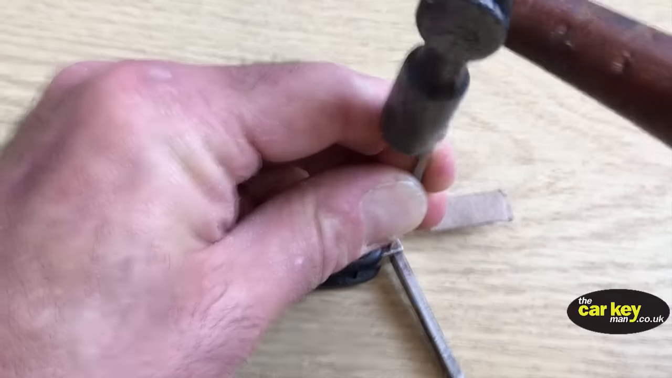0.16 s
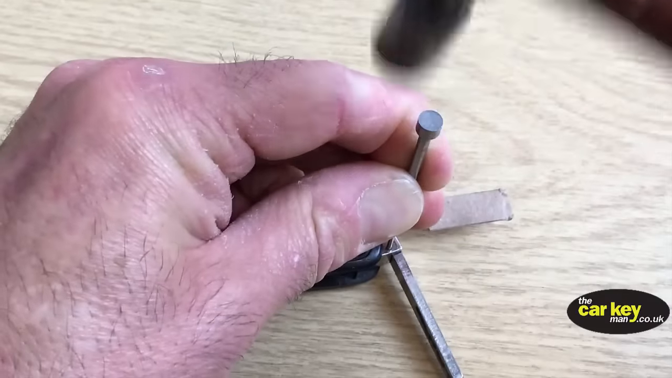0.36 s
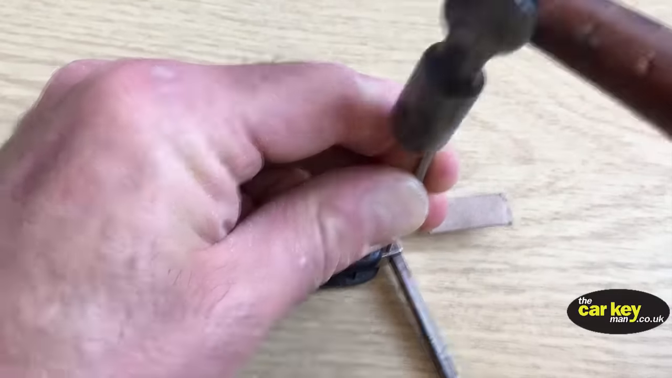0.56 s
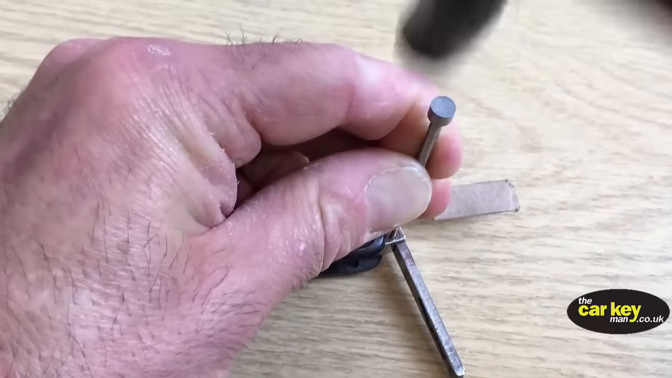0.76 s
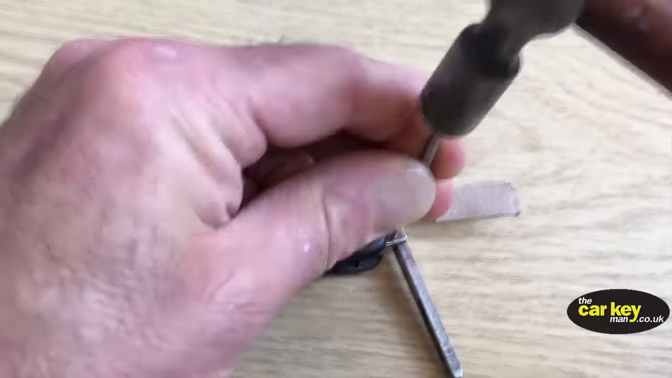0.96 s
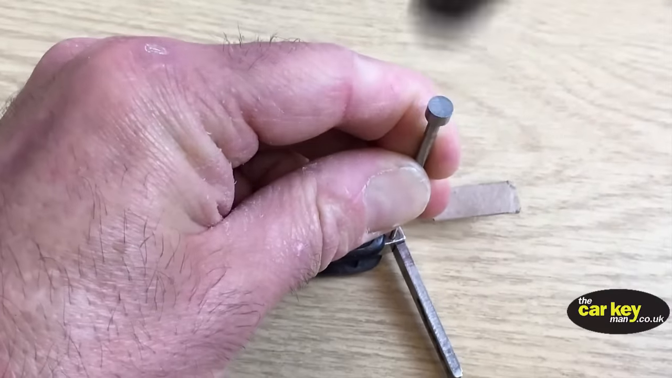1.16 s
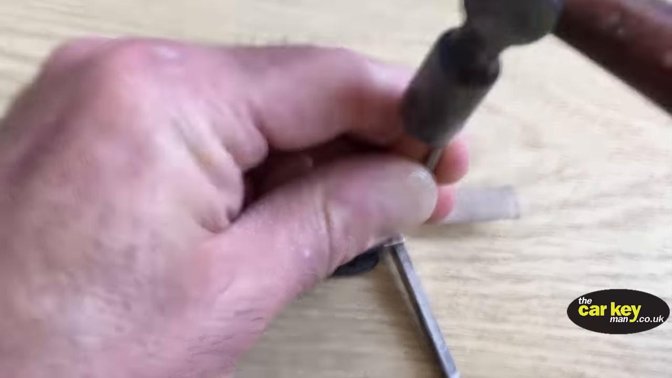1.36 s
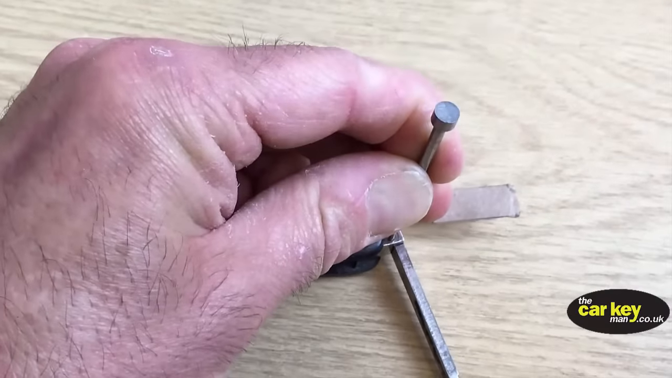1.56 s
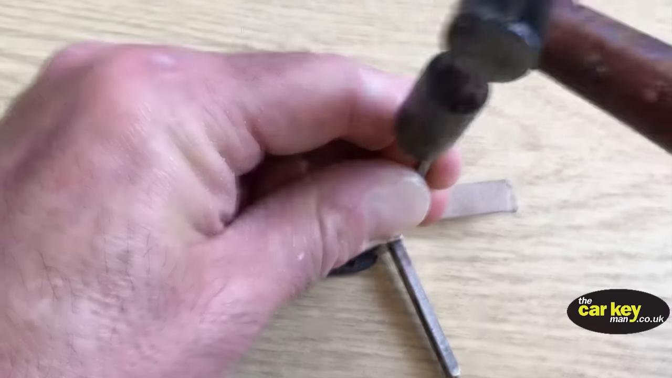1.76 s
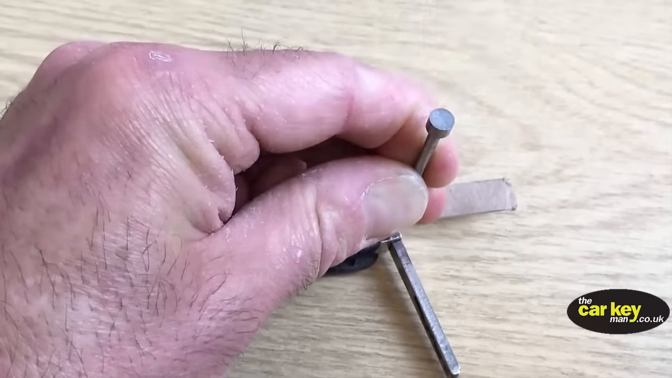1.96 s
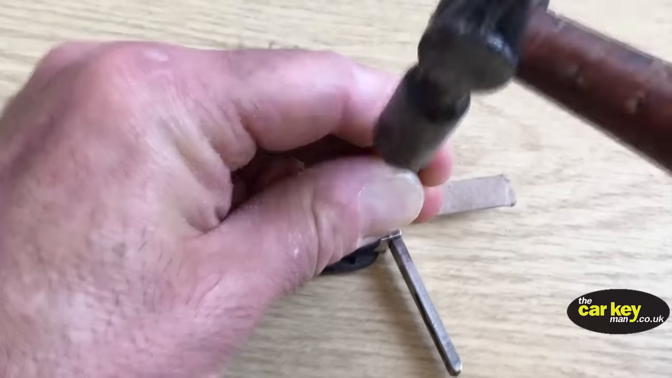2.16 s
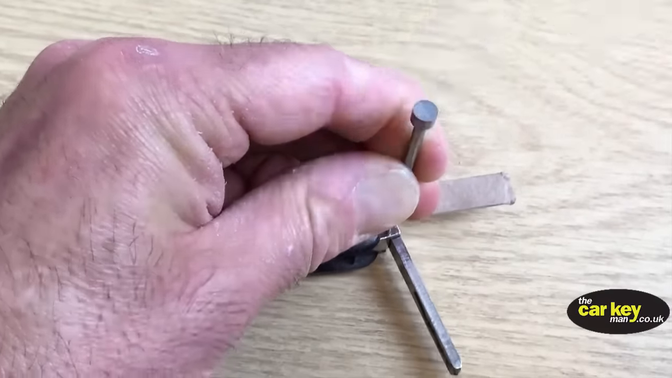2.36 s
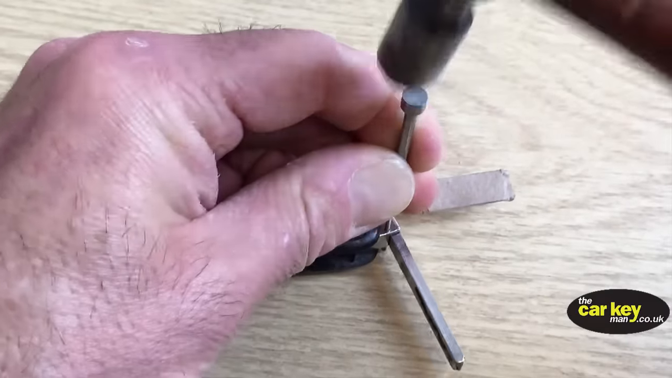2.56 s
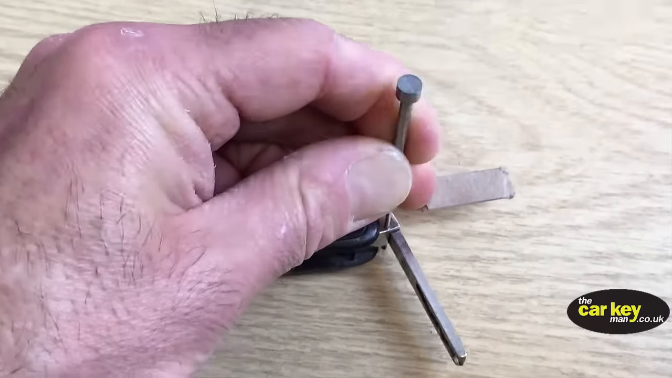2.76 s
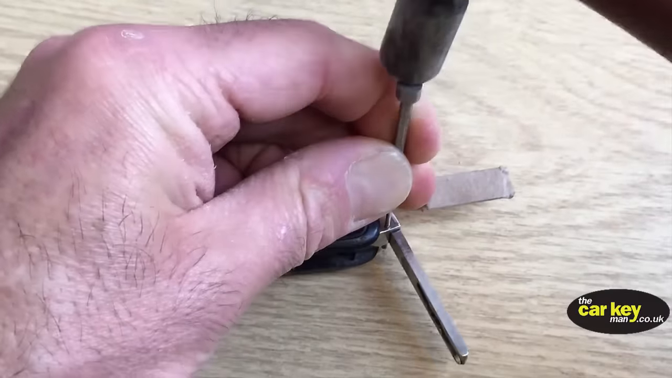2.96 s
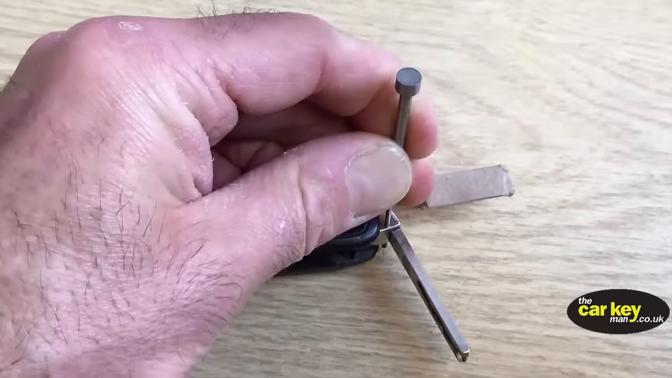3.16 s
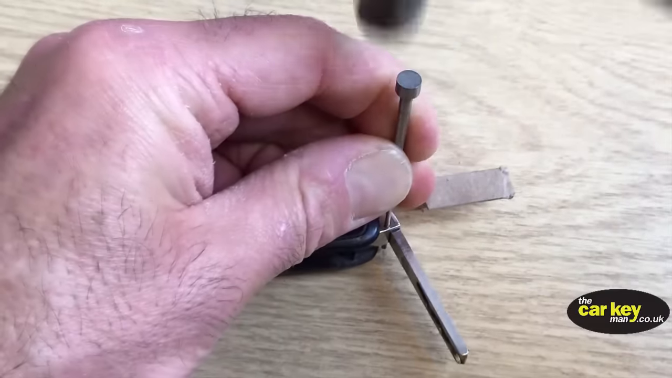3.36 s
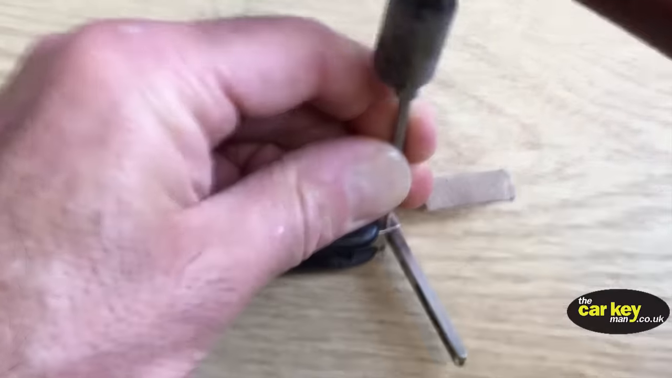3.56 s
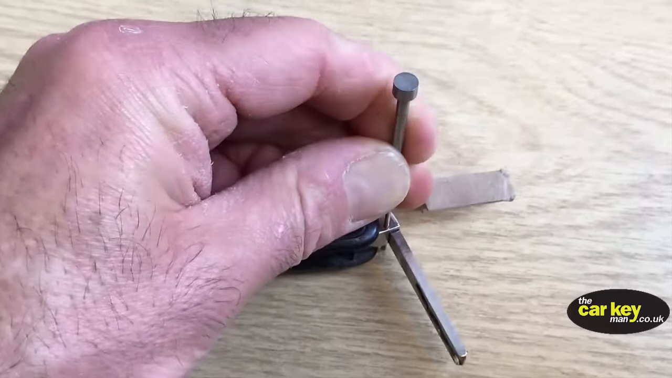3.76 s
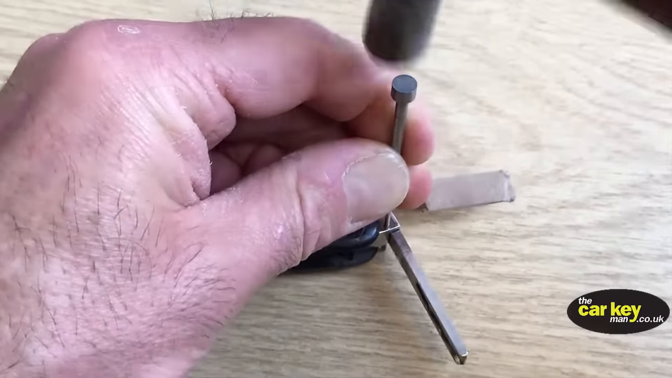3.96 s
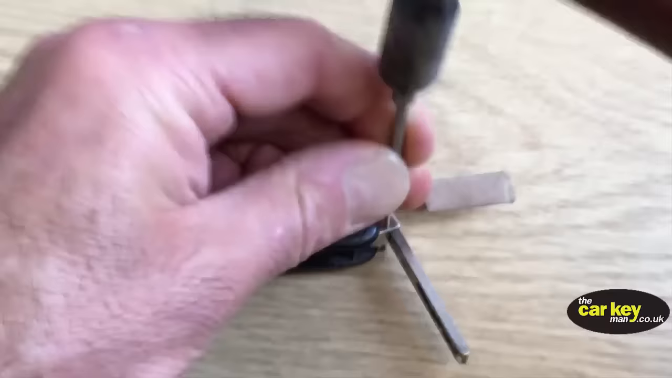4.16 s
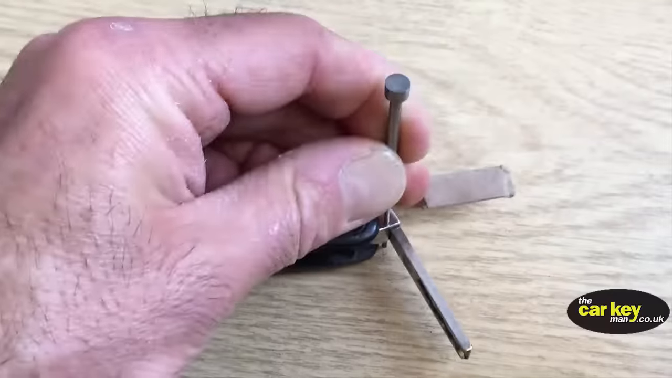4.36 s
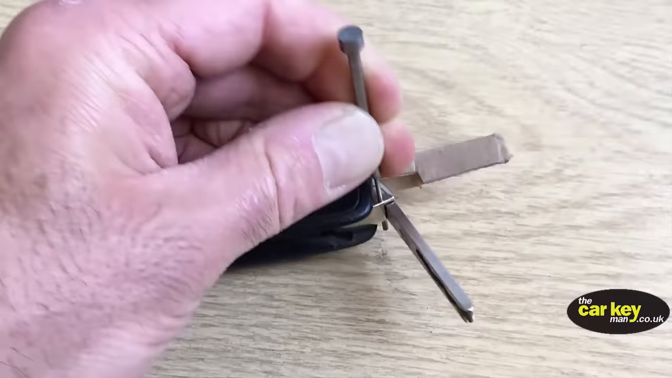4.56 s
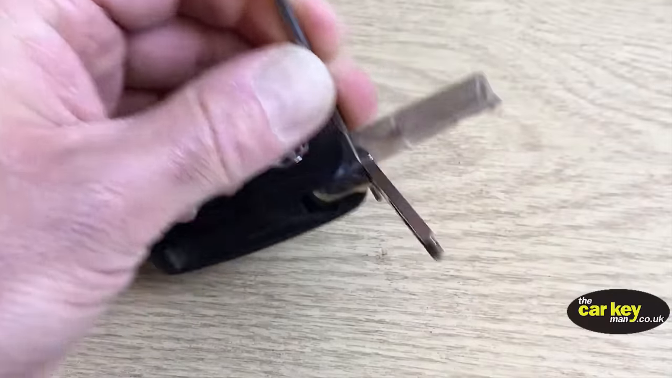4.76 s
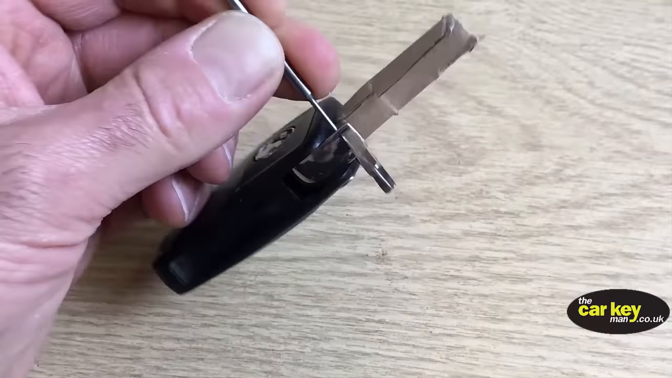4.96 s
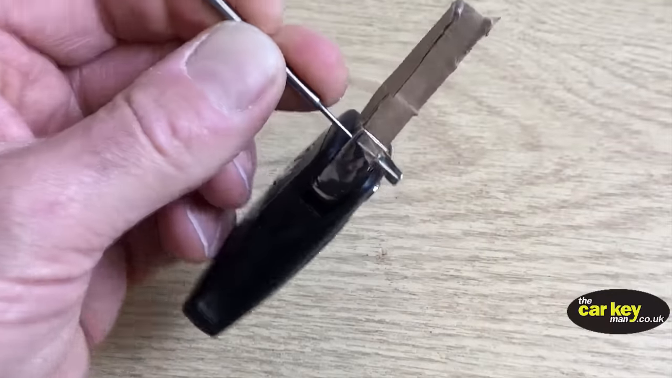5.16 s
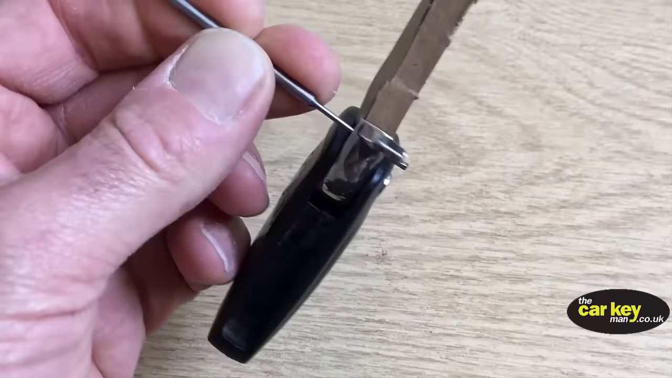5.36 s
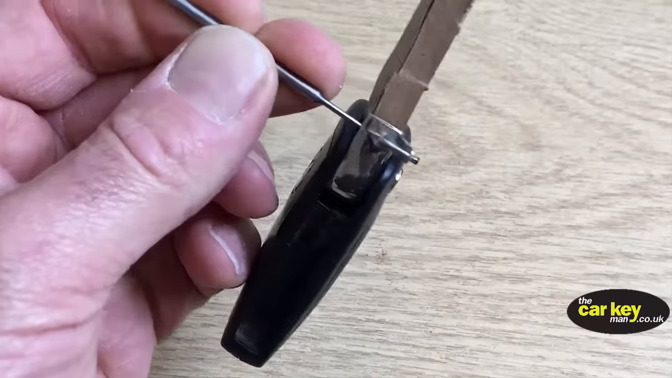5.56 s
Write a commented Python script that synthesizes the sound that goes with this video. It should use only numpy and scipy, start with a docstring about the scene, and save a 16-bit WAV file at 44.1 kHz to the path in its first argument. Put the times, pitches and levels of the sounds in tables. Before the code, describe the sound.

A small hammer taps a steel punch in quick even blows on a wooden table, then stops as a plastic key is turned over with soft knocks.

```python
"""A small hammer taps a steel pin punch in quick even strokes, driving the pin out of a car key on a wooden table.
Each blow is a noise-burst tick on steel plus a push on the wood, whose damped modes ring into a small room;
the loudest swings overload the close microphone. Room air and low rumble run throughout; loose steel soon clicks.
The rumble swells once; then the hand turns the key over: grainy filtered noise slides and drags,
and light knocks of plastic sound on the wood."""
import sys
import numpy as np
from scipy import signal
from scipy.fft import rfft, irfft, next_fast_len
from scipy.io import wavfile

SR = 44100
rng = np.random.default_rng(int(sys.argv[2]) if len(sys.argv) > 2 else 0)


def generate_wav(signal):
    """Clip the signal to [-1, 1] and save it as 16-bit WAV at the path in sys.argv[1]."""
    frames = np.transpose(np.atleast_2d(signal))
    scaled = np.clip(frames, -1, 1) * 32767
    pcm = np.round(scaled).astype(np.int16)
    wavfile.write(sys.argv[1], SR, pcm)


N = 247354
RING_SAMPLES = 32768
AGE_S = np.arange(RING_SAMPLES) / SR
WOOD_DB = 42  # added to the force of every push on the table

# decay of the dense ring of table and room: hz, t60_s
RING_DECAY = [(80, 0.3), (210, 0.25), (560, 0.29), (1470, 0.24), (3900, 0.2), (10200, 0.15)]


def undb(db):
    """Decibels to gain."""
    return 10 ** (np.asarray(db) / 20)


def unit(x):
    """Scale to an energy of one."""
    return x / np.sqrt(np.sum(x ** 2))


def at(points, hz):
    """Read a table of (hz, value) on a log-frequency axis."""
    point_hz, value = np.transpose(points)
    return np.interp(np.log(hz + 1), np.log(point_hz), value)


def colour(x, db_of):
    """Causal minimum-phase filter, by folding the cepstrum of a gain in dB over frequency."""
    size = next_fast_len(len(x), True) * 2
    hz = np.arange(size // 2 + 1) * SR / size
    cepstrum = irfft(np.log(undb(db_of(hz))))
    cepstrum[1:size // 2] *= 2
    cepstrum[size // 2 + 1:] = 0
    response = np.exp(rfft(cepstrum))
    return irfft(rfft(x, size) * response)[:len(x)]


def tint(x, points):
    """Filter with a table of (hz, gain_db)."""
    return colour(x, lambda hz: at(points, hz))


def fade(t60_s):
    """Exponential decay by 60 dB in t60_s."""
    return np.exp(-np.log(1000) * AGE_S / t60_s)


def burst(t60_s):
    """Decaying noise: a swarm of tiny reflections."""
    return unit(rng.standard_normal(RING_SAMPLES) * fade(t60_s))


def modes(table, t60_of, in_step_hz=450):
    """Damped sines: low ones all start downwards, high ones alternate as on either side of their nodes."""
    total = np.zeros(RING_SAMPLES)
    for k, (hz, db) in enumerate(table):
        sign = -1 if hz < in_step_hz else (-1) ** k
        total += sign * undb(db) * fade(t60_of(hz)) * np.sin(2 * np.pi * hz * AGE_S)
    return unit(total)


def add(track, s, sound):
    """Mix a sound in at a time; one that began before zero leaves only its tail."""
    start = int(s * SR)
    sound, start = sound[max(-start, 0):], max(start, 0)
    track[start:start + len(sound)] += sound[:N - start]


def hiss(points):
    """Coloured noise with an rms of one."""
    return unit(tint(rng.standard_normal(N), points)) * np.sqrt(N)


def strokes(rows, attack_s, release_s):
    """Gain of (start_s, length_s, level_db) events: straight rise, hold, exponential release."""
    t = np.arange(N) / SR
    total = np.zeros(N)
    for start_s, length_s, db in rows:
        rise = np.clip((t - start_s) / attack_s, 0, 1)
        release = np.exp(-np.maximum(t - start_s - length_s, 0) / release_s)
        total += undb(db) * rise * release
    return total


def wander(rate_hz):
    """Normal random values, rate_hz of them a second, joined by straight lines."""
    return np.interp(np.arange(N) / SR * rate_hz, np.arange(N), rng.standard_normal(N))


def background(air_db=-59, rumble_db=-54, waver_db=3, waver_hz=5):
    """Steady noise of room air, and a low rumble that wavers and swells once."""
    # room air: hz, relative_db
    air_colour = [(30, 12.5), (130, -7), (350, -7), (900, -19.5), (2500, -24.5), (6000, -35),
                  (11000, -43.5)]
    # swell added to the steady rumble: start_s, length_s, added_gain_db (re the steady rumble)
    swells = [(3.5, 0.24, 12)]
    rumble_colour = [(10, 4.5), (25, -4.5), (70, -14.5), (130, -25.5), (400, -40.0), (2000, -66), (8000, -95.5)]
    swell = 1 + strokes(swells, attack_s=0.024, release_s=.17)
    rumble = hiss(rumble_colour) * swell
    return undb(air_db) * hiss(air_colour) + undb(rumble_db + waver_db * wander(waver_hz)) * rumble


def diffuse():
    """Dense ring of table and room: noise in overlapping bands, each with its own decay."""
    noise = rfft(rng.standard_normal(RING_SAMPLES))
    noise = noise / np.abs(noise)
    hz = np.arange(RING_SAMPLES // 2 + 1) * SR / RING_SAMPLES
    centres_hz = np.array(RING_DECAY)[:, 0]
    total = np.zeros(RING_SAMPLES)
    for share, (_, t60_s) in zip(np.eye(len(RING_DECAY)), RING_DECAY):
        band = irfft(noise * np.interp(np.log(hz + 1), np.log(centres_hz), share))
        total += band * fade(t60_s)
    return total


def wood(ring, push_db=-7.5, slap_db=0.5, slap_t60_s=0.027, echo_db=-9, echo_s=.005, modes_db=0,
         ring_scale=0.74, room_db=-3, fresh_share=0.89, late_db=-38, late_t60_s=.9,
         linger_db=-22, linger_t60_s=0.43):
    """One push on the table: the pulse itself, a short slap, the modes and the room."""
    # table top modes: hz, relative_db
    table_modes = [(131, -6), (168, -9), (184, -4), (222, 4.5), (241, 0.5), (264, -2), (301, -6),
                   (333, -3.5), (368, -11), (384, -4.5), (406, -6), (442, -5.5), (477, -11), (514, -6),
                   (578, -8), (634, -11), (656, -2.5), (762, -1.5), (781, -7), (857, -6.5), (967, -11),
                   (1093, -18), (1172, -8), (1197, -8), (1240, -6.5), (1321, -9.5), (1524, -8.5),
                   (1781, -8.5), (1815, -11.5), (2131, -18)]
    # push and slap: hz, relative_db
    wood_colour = [(40, -12), (110, -14), (250, 0), (450, 3), (800, -4), (1300, -0.5), (2000, -4.5),
                   (2600, -15.5), (4500, -22.5), (7000, -26), (11000, -37)]
    # dense ring: hz, relative_db
    room_colour = [(40, -15.5), (110, -13.5), (250, -1.5), (450, 0), (560, -1.5), (750, -2), (1300, 2),
                   (2050, -5.5), (2600, -11), (4500, -18), (7000, -23.5), (11000, -31)]
    # late room tail: hz, relative_db
    late_colour = [(60, 1.5), (230, 5), (600, -7), (1400, -16.5), (3000, -20), (11000, -44)]
    # faint notes that linger in the room: hz, relative_db
    linger_modes = [(222, -4.5), (357, -0.5), (592, -4), (893, -3.5), (1170, -10), (1410, -6.5)]
    pulse = 1. * (AGE_S == 0)
    push = -undb(push_db) * unit(tint(pulse, wood_colour))
    slap = undb(slap_db) * unit(tint(burst(slap_t60_s), wood_colour))
    direct = push + slap
    # a nearby surface throws the attack straight back
    echo = undb(echo_db) * np.interp(AGE_S - echo_s, AGE_S, direct, left=0)
    top = undb(modes_db) * modes(table_modes, lambda hz: ring_scale * at(RING_DECAY, hz))
    # the dense ring is part shared, part drawn afresh for each push
    room = undb(room_db) * unit(tint(ring + fresh_share * diffuse(), room_colour))
    late = undb(late_db) * unit(tint(burst(late_t60_s), late_colour))
    linger = undb(linger_db) * modes(linger_modes, lambda hz: linger_t60_s)
    return direct + echo + top + room + late + linger


def contact(sound, thud_db, hard_db, knock_hz, knock_db, thud_hz=235, thud_octaves=0.94, hard_hz=2200,
            knock_octaves=.36, bounce_db=-9, bounce_t60_s=.045, passed_on=0.76):
    """Firm seating brings out the thud, hard contact the treble; the key bounces at its own pitch."""
    def hump(hz, centre_hz, octaves):
        """Bell on a log-frequency axis."""
        return np.exp(-.5 * (np.log2((hz + 1) / centre_hz) / octaves) ** 2)

    def gain_db(hz):
        """Thud, hardness and knock summed in dB."""
        thud = thud_db * hump(hz, thud_hz, thud_octaves)
        treble = hard_db * (1 - 1 / (1 + (hz / hard_hz) ** 6))
        knock = passed_on * knock_db * hump(hz, knock_hz, knock_octaves)
        return thud + treble + knock

    bounce = -unit(fade(bounce_t60_s) * np.sin(2 * np.pi * knock_hz * AGE_S))
    return colour(sound, gain_db) + undb(bounce_db + knock_db) * bounce


def steel(tick_t60_s=0.0064, ring_db=-23, ring_t60_s=.19, room_db=-7, room_t60_s=0.025):
    """Steel on steel: a sharp tick, a ring damped by the fingers and a little room."""
    # modes of punch, blade and hammer: hz, relative_db
    steel_modes = [(2850, 0), (4120, -6), (6280, 0), (6560, -6)]
    # tick: hz, relative_db
    tick_colour = [(300, -22.5), (2000, -5.5), (4000, 5), (7000, -6.5), (9000, 4.5), (11000, 0.5)]
    noise = burst(tick_t60_s) + undb(room_db) * burst(room_t60_s)
    tick = unit(tint(noise, tick_colour))
    return tick + undb(ring_db) * modes(steel_modes, lambda hz: ring_t60_s)


def shudder(t60_s=0.31):
    """The whole table shakes on its legs in slow damped modes."""
    # table frame modes: hz, relative_db
    frame_modes = [(27, 1), (38, -7), (52, -8), (68, -0.5), (85, 1), (131, 0.5)]
    return modes(frame_modes, lambda hz: t60_s)


def hammer(ring, shudder_db=7, shudder_db_per_db=0.14, usual_force_db=-25):
    """Each blow ticks on the punch and passes through the key into the table."""
    # blows: start_s, force_db (re WOOD_DB), thud_db, hardness_db, hardness_above_hz,
    # knock_pitch_hz (key on wood), knock_db (relative), steel_tick_db
    blows = [(-0.2,-20,2.5,-5,2200,1190,-6,7), (0.2039,-22,7.5,2.5,2180,1225,-1,1.5),
             (0.616,-21.5,7.5,3.5,2170,686,1.5,6), (1.0133,-20,6,2.5,2236,1258,2,3.5),
             (1.396,-17,6,1.5,2180,935,-3.5,6.5), (1.7687,-14.5,-9.5,-6.5,2300,1056,5,7.5),
             (2.157,-24,4,-7,2100,690,5.5,1.5), (2.52,-29,0,-7.5,2800,837,4,0),
             (2.9598,-35,2.5,-2.5,2195,1313,7,-5), (3.285,-32.5,0.5,-1.5,2200,742,10,-5),
             (3.602,-27,1,-5,2100,729,5.5,7), (3.9029,-26,5.5,-3,2400,830,7,6.5),
             (4.236,-23,5,-3.5,1900,1225,1.5,10.5)]
    out = np.zeros(N)
    for s, force_db, thud_db, hard_db, hard_hz, knock_hz, knock_db, tick_db in blows:
        push = contact(wood(ring), thud_db, hard_db, knock_hz, knock_db, hard_hz=hard_hz)
        shake_db = shudder_db + shudder_db_per_db * (force_db - usual_force_db)
        add(out, s, undb(WOOD_DB + force_db) * push)
        add(out, s, undb(tick_db) * steel())
        add(out, s, undb(shake_db) * shudder())
    return out


def loose_steel(click_db=2, click_t60_s=.0035, room_db=-15, room_t60_s=.14):
    """Loose punch and blade click: very short coloured noise with a little room."""
    # clicks: start_s, level_db (re click_db)
    clicks = [(1.8842, -26), (2.2098, -23), (2.5755, -25.5), (3.0057, -28), (3.3113, -15), (3.6270, -10.5),
              (5.015, -46), (5.312, -44.5)]
    # click colour: hz, relative_db
    click_colour = [(500, -37), (2000, -18), (4000, 6.5), (7000, 8), (9000, 7.5), (11000, -56)]
    out = np.zeros(N)
    for s, db in clicks:
        noise = burst(click_t60_s) + undb(room_db) * burst(room_t60_s)
        add(out, s, undb(click_db + db) * unit(tint(noise, click_colour)))
    return out


def rubbing(grain_db=3, grain_hz=63, attack_s=0.021, release_s=0.035):
    """Fingers slide over the case in uneven grains; the case drags on the wood with a hollow note."""
    # fingers over the key: start_s, length_s, level_db (before grain)
    slides = [(4.62, 0.17, -74.5), (5.01, 0.12, -62.5), (5.26, 0.15, -63.5), (5.52, 0.088, -71.5)]
    # key over the wood: start_s, length_s, level_db (before grain)
    drags = [(4.65, 0.074, -71.5), (4.765, 0.036, -58.5)]
    finger_colour = [(100, -20.0), (800, 3.5), (2000, 0), (4000, -11), (8000, -15.5), (11000, -23.5)]
    drag_colour = [(200, -16.5), (620, -12), (750, 3), (880, -21), (1100, -12), (2500, -29), (8000, -40)]
    fingers = hiss(finger_colour) * strokes(slides, attack_s, release_s)
    drag = hiss(drag_colour) * strokes(drags, attack_s, release_s)
    return (fingers + drag) * undb(grain_db * wander(grain_hz))


def key_knocks(ring):
    """The plastic case knocks on the table: light and soft, it moves little bass and makes little top."""
    # touches: start_s, force_db (re WOOD_DB, before case colour), hardness_db
    knocks = [(4.681, -75.5, 6), (4.982, -73, -4), (5.015, -74, 11.5), (5.13, -38.5, -11),
              (5.144, -33.5, -10.5), (5.1742, -38, -21), (5.320, -67.5, 0.5), (5.376, -70, 7),
              (5.507, -84.5, 12)]
    case_colour = [(100, -11.5), (210, -9.5), (290, 0), (450, -4.0), (1500, -5.5), (3300, -0.5),
                   (7000, -7), (11000, -13)]
    out = np.zeros(N)
    for s, force_db, hard_db in knocks:
        push = contact(wood(ring), thud_db=4, hard_db=hard_db, knock_hz=875, knock_db=10.0)
        add(out, s, undb(WOOD_DB + force_db) * push)
    return tint(out, case_colour)


def scene():
    """Hammer and key share one table and one room."""
    ring = diffuse()
    mix = background() + hammer(ring) + loose_steel() + rubbing() + key_knocks(ring)
    return mix[None]


def record(dry, ceiling=.73, top_hz=10850):
    """The microphone flattens the loudest swings; the top is cut."""
    flattened = dry / (1 + (dry / ceiling) ** 8) ** (1 / 8)
    low_pass = signal.ellip(8, .1, 60, top_hz, fs=SR, output="sos")
    return signal.sosfiltfilt(low_pass, flattened)


dry = scene()
out = record(dry)
generate_wav(out)
```